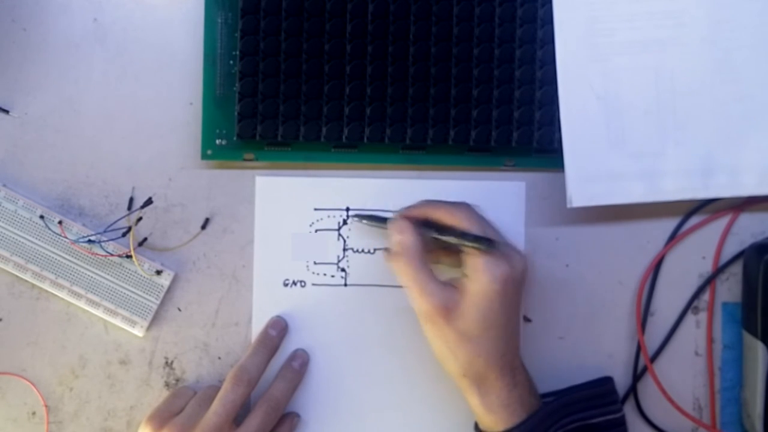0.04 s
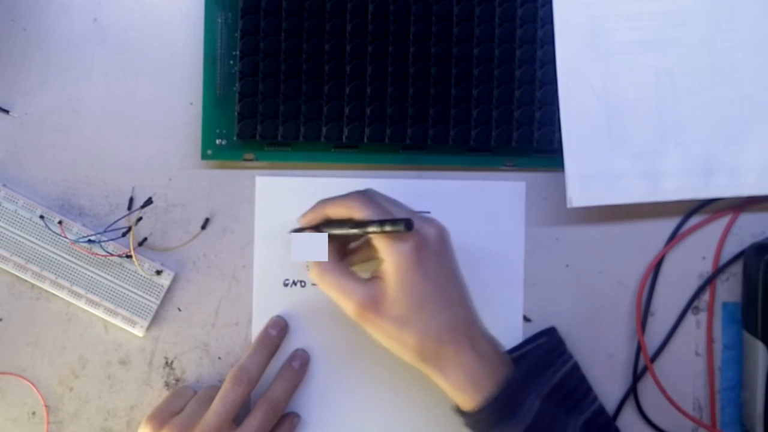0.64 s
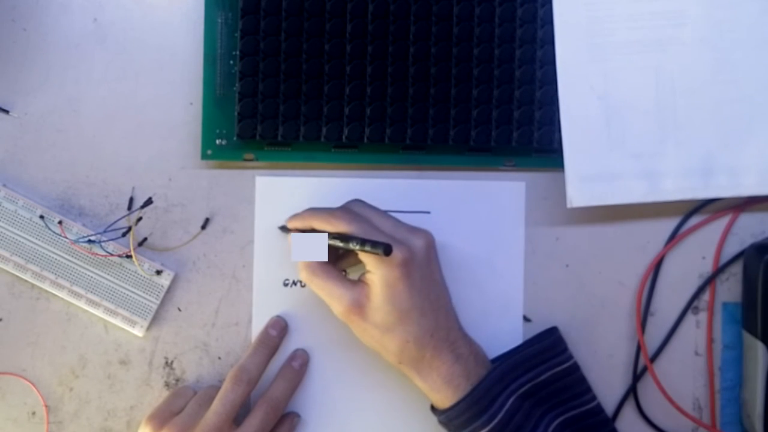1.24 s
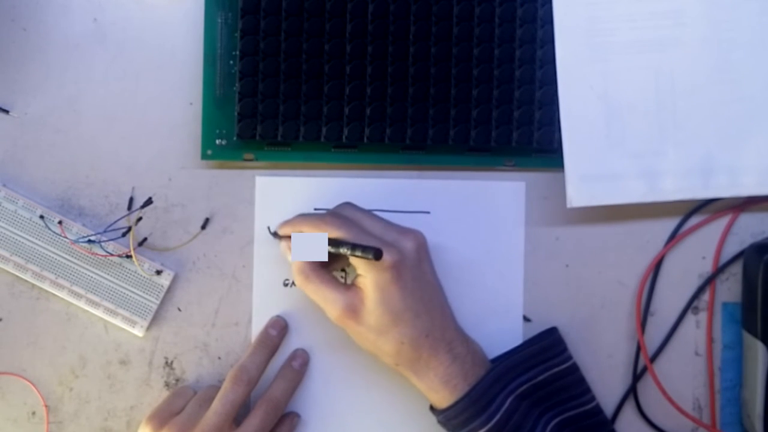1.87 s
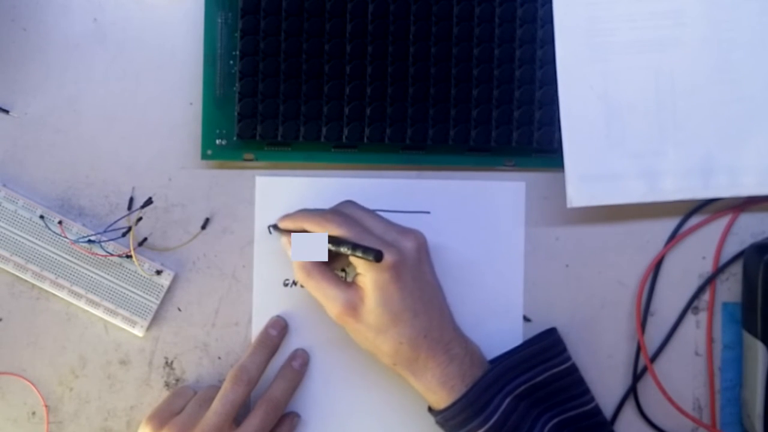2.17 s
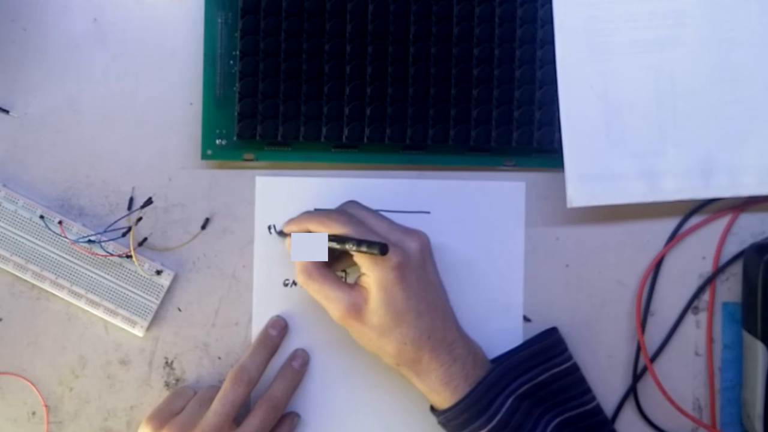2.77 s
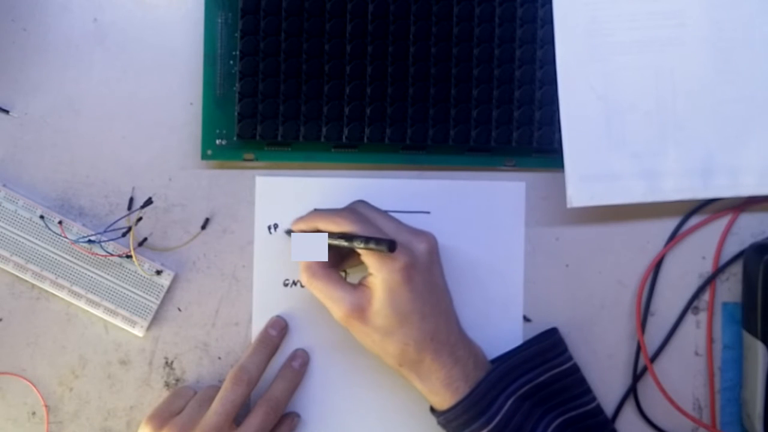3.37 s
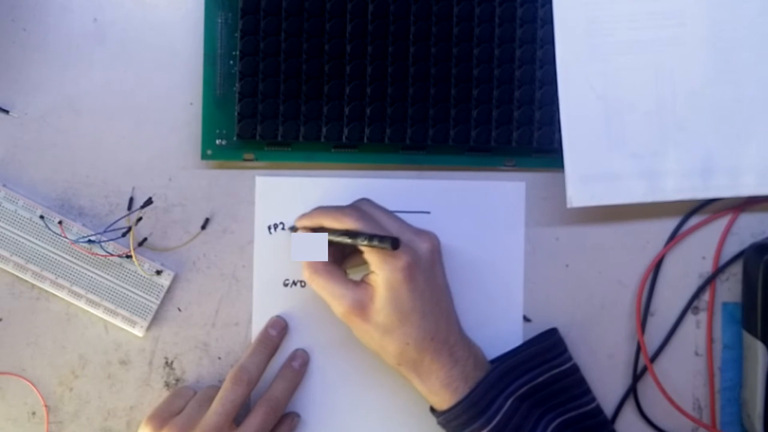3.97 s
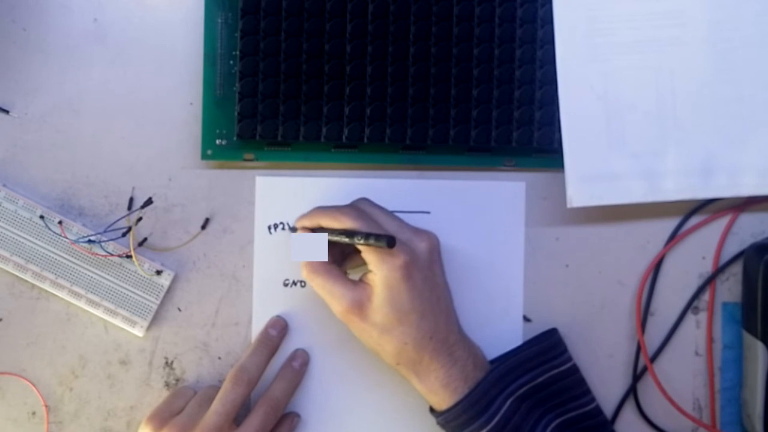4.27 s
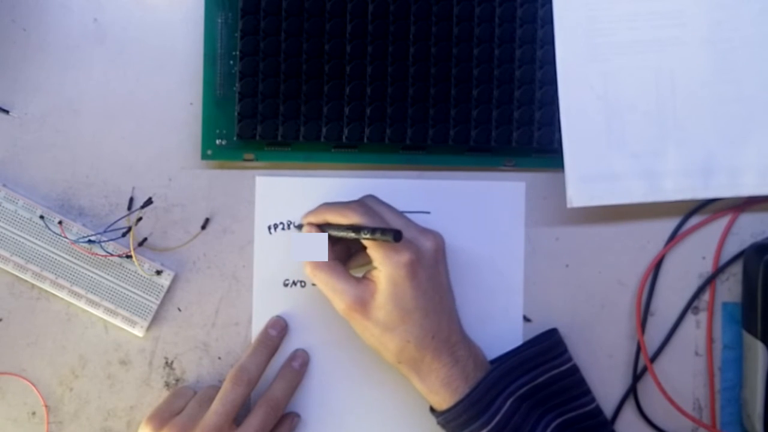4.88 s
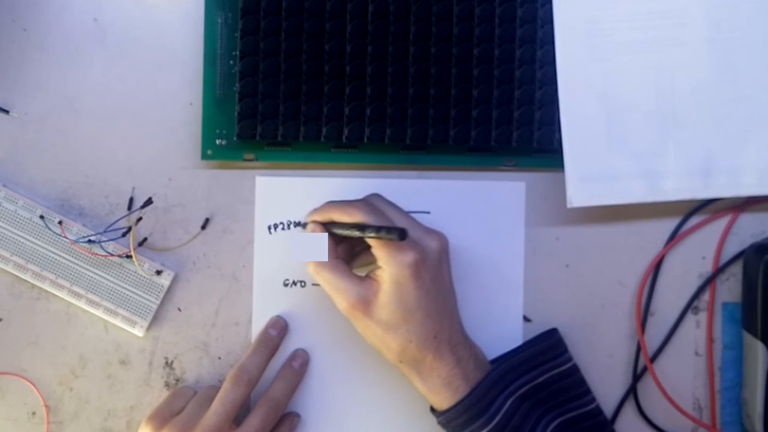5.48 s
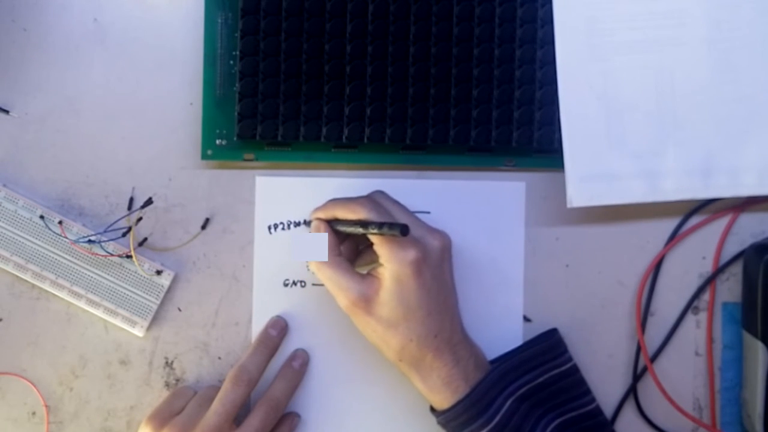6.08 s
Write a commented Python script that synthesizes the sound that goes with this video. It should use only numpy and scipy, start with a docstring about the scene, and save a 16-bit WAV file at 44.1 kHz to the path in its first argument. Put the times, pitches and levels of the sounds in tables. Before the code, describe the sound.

A steady hiss, low room rumble and faint electrical hum run throughout. Close to the microphone, a felt pen letters paper on a desk: the hand and tip slide softly over the sheet, with brief scratchy strokes and light ticks where the tip lands. The ticks are sparse at first and a little clearer in the second half. A few soft swells of deep rumble come near the end. The room sounds small and fairly dry.

```python
"""Room rumble, microphone hiss and a mains hum, in mono. Close by, a felt pen letters paper on a desk.
Hand and tip slide over the sheet. In quick strokes the tip rasps as fibres catch and let go;
where it lands or turns it judders and rings the desk. Nearby walls add a short tail.
Near the end come a few slow swells of deep rumble."""
import sys
import numpy as np
from scipy import signal
from scipy.fft import rfft, irfft, next_fast_len
from scipy.io import wavfile

SR = 44100
rng = np.random.default_rng(int(sys.argv[2]) if len(sys.argv) > 2 else 0)


def int16_out(signal):
    """Quantize to a 16-bit WAV file."""
    q = np.round(np.clip(np.atleast_2d(signal).T, -1, 1) * 32767)
    wavfile.write(sys.argv[1], SR, q.astype(np.int16))


N = 274302
N_FFT = next_fast_len(N, real=True)
TIME_S = np.arange(N) / SR
FREQ_HZ = np.maximum(np.fft.rfftfreq(N_FFT, 1 / SR), 1)

# room noise and microphone hiss: (frequency [Hz], relative density [dB])
ROOM_SPECTRUM = [(8, 1), (30, -0.5), (50, -4), (80, -8), (150, -13), (300, -17), (600, -22), (1000, -25),
                 (2000, -29), (4000, -31.5), (8000, -33.5), (15500, -34.5)]
# hand and tip slide, lifting in between: (start [s], end [s], relative level [dB])
SLIDES = [(0.377, .62, -54), (.97, 1.29, -51), (1.56, 2.2, -52.5), (2.62, 3.323, -53), (3.6, 3.9, -57),
          (4.28, 4.727, -50.5), (4.817, 6.13, -50)]
# rasp of paper fibres: (frequency [Hz], relative level [dB])
PAPER_SPECTRUM = [(200, 8.5), (600, -27), (1500, 2.5), (2900, -1), (3700, -1.5), (5400, -1.5), (7500, -0.5),
                  (10500, 0), (12000, -1), (13400, -1), (15500, -5)]
# modes of desk and pen: (frequency [Hz], width [Hz], relative level [dB])
DESK_MODES = [(523, 59, -2.5), (715, 156, 4), (815, 57, 0.5), (992, 87, -1.5), (1352, 160, -3),
              (1803, 99, -18), (1855, 205, -4), (2296, 120, -15.5), (2834, 51, -9), (3200, 150, -37)]
# heel of the hand shifts on the desk: (centre [s], half length [s], level [dB])
HAND_SHIFTS = [(.53, .06, -52), (1.09, 0.076, -51), (1.66, 0.13, -50.5), (5.42, 0.23, -50),
               (5.95, 0.14, -50)]
# brush of skin: (frequency [Hz], relative level [dB])
SKIN_SPECTRUM = [(60, -6), (160, -2), (450, 0), (800, -9.5), (1500, -13.5), (4000, -18), (15000, -50)]
# quick strokes of the tip: (centre [s], half length [s], level [dB])
STROKES = [(0.513, 0.019, -51), (1.963, 0.035, -49), (2.818, 0.026, -49), (3.277, 0.017, -46),
           (3.886, 0.038, -46), (4.343, .025, -52), (4.64, 0.022, -41.5), (4.968, 0.016, -48),
           (5.08, 0.02, -41), (5.384, 0.02, -48), (5.505, 0.021, -42.5), (6.015, 0.023, -41.5)]
# modes of barrel and nib: (frequency [Hz], width [Hz], relative level [dB])
BARREL_MODES = [(1900, 260, -2), (2520, 260, 0), (2850, 280, 3), (3220, 320, 3), (4480, 350, -1),
                (5500, 1100, -3)]
# tip landings; the judder sweeps up as the tip gathers speed, down as it brakes:
# (centre [s], half length [s], level [dB], pitch [ratio], hardness [dB/octave], sweep [s/octave])
LANDINGS = [(1.974, .018, -51, 1.08, 1, 0.0038), (2.802, 0.01, -50, 1.1, 1, 0),
            (3.278, 0.013, -38, 1.05, 2.5, 0.0035), (3.913, 0.012, -40.5, 1.05, 1, -0.015),
            (4.614, 0.0032, -35.5, .92, -8, 0.0013), (4.625, 0.0088, -38, 1, 3, .006),
            (5.1, 0.021, -43.5, 1.04, 2, -0.0068), (5.517, 0.011, -38.5, 1.08, -5.5, -.003)]
# swells of deep rumble: (centre [s], half length [s], level [dB], corner [Hz])
RUMBLE_SWELLS = [(5.268, 0.068, -17.5, 4.7), (5.633, 0.03, -23.5, 23), (5.725, 0.11, -19, 6.4),
                 (6.21, 0.033, -31.5, 41)]


def undb(db):
    """Decibels to gain."""
    return 10 ** (np.asarray(db) / 20)


def rms(x):
    """Root mean square."""
    return np.sqrt(np.mean(x ** 2))


def unit(x):
    """Scale to rms 1."""
    return x / rms(x)


def noise():
    """White noise."""
    return rng.standard_normal(N)


def shape(x, response):
    """Filter by a frequency response, to rms 1."""
    return unit(irfft(rfft(x, N_FFT) * response, N_FFT)[:N])


def colour(points):
    """Response through (frequency [Hz], level [dB]) points."""
    hz, db = np.transpose(points)
    return undb(np.interp(np.log(FREQ_HZ), np.log(hz), db))


def wander(corner_hz):
    """Slow random wander, rms 1."""
    return shape(noise(), 1 / (1 + (FREQ_HZ / corner_hz) ** 4))


def swell(centre_s, half_s):
    """Gaussian rise and fall."""
    return np.exp(-.5 * ((TIME_S - centre_s) / half_s) ** 2)


def room_noise(level_db=-38, drift_db=0.26):
    """Even room rumble and microphone hiss."""
    return shape(noise(), colour(ROOM_SPECTRUM)) * undb(level_db + drift_db * wander(2.7))


def mains_hum(hum_hz=119.9, level_db=-48.5, waver_db=1.5, waver_rad=0.11):
    """Slightly wavering tone at twice the mains rate."""
    tone = unit(np.sin(2 * np.pi * hum_hz * TIME_S + waver_rad * wander(8)))
    return tone * undb(level_db + waver_db * wander(6.4))


def slide_force(start_s, end_s, attack_s=0.022, release_s=0.04):
    """Force eases in, holds, eases off."""
    rise = 1 + np.tanh((TIME_S - start_s) / (2 * attack_s))
    fall = 1 + np.tanh((end_s - TIME_S) / (2 * release_s))
    return rise * fall / 4


def slips(rate_hz, scatter_db):
    """Tiny random clicks of uneven size: fibres catch and let go."""
    clicks = (rng.random(N) < rate_hz / SR) * np.sign(noise())
    return unit(clicks * undb(scatter_db * noise()))


def ringing(modes, pitch=1):
    """Response of damped modes with steep skirts; the place of contact shifts their pitch."""
    return sum(undb(db) / (1 + 2j * (FREQ_HZ - hz * pitch) / width_hz) ** 2
               for hz, width_hz, db in modes)


def paper_rub(desk_db=-8, gain_db=-1, uneven_db=2.14):
    """Skin and tip slide lightly over the sheet and stir the desk."""
    fibres = slips(rate_hz=9000, scatter_db=2)
    force = sum(undb(db) * slide_force(start_s, end_s) for start_s, end_s, db in SLIDES)
    force *= undb(gain_db + uneven_db * wander(30))
    paper = shape(fibres, colour(PAPER_SPECTRUM))
    desk = undb(desk_db) * shape(noise(), ringing(DESK_MODES))
    return force * (paper + desk)


def hand_brush():
    """The hand moves to the next letters with a dull brush."""
    force = sum(undb(db) * swell(centre_s, half_s) for centre_s, half_s, db in HAND_SHIFTS)
    return force * shape(noise(), colour(SKIN_SPECTRUM))


def tip_rasp(desk_db=-13, barrel_db=-7, uneven_db=0.2):
    """The tip drags over fibres: a bright dense crackle that stirs barrel and desk."""
    power = sum((undb(db) * swell(centre_s, half_s)) ** 2 for centre_s, half_s, db in STROKES)
    fibres = slips(rate_hz=7000, scatter_db=5)
    force = np.sqrt(power) * undb(-uneven_db * wander(90))
    paper = shape(fibres, colour(PAPER_SPECTRUM))
    desk = undb(desk_db) * shape(fibres, ringing(DESK_MODES))
    barrel = undb(barrel_db) * shape(fibres, ringing(BARREL_MODES))
    return force * unit(paper + desk + barrel)


def tip_judder(pivot_hz=1000):
    """Each landing is a flurry of slips sweeping the desk's modes; harder contact favours high ones."""
    out = np.zeros(N)
    octaves = np.log2(np.clip(FREQ_HZ, 400, 4000) / pivot_hz)
    for centre_s, half_s, db, pitch, hardness_db_per_oct, sweep_s_per_oct in LANDINGS:
        force = swell(centre_s, half_s)
        delay_s = sweep_s_per_oct * octaves  # each mode is reached in turn
        sweep = np.exp(-2j * np.pi * np.cumsum(delay_s) * SR / N_FFT)
        response = ringing(DESK_MODES, pitch) * undb(hardness_db_per_oct * octaves) * sweep
        ring = shape(force * slips(rate_hz=1500, scatter_db=1.5), response)
        out += undb(db) * rms(force) * ring
    return out


def deep_rumble():
    """Slow pressure swings, mostly below hearing, with a soft low edge."""
    out = np.zeros(N)
    for centre_s, half_s, db, corner_hz in RUMBLE_SWELLS:
        envelope = swell(centre_s, half_s)
        ratio = FREQ_HZ / corner_hz
        band = ratio / (1 + ratio ** 2) ** 2
        out += undb(db) * rms(envelope) * shape(envelope * noise(), band)
    return out


def add_reflections(x, t60_s=0.14, wet_db=-11, gap_s=0.004):
    """Nearby walls add a short diffuse tail."""
    t = TIME_S[:SR // 2]
    tail = rng.standard_normal(len(t)) * undb(-60 * t / t60_s) * (t > gap_s)
    return x + undb(wet_db) * signal.fftconvolve(x, tail / np.linalg.norm(tail))[:N]


def scene():
    """One microphone feeds both channels."""
    writing = tip_rasp() + paper_rub() + hand_brush() + tip_judder()
    mono = add_reflections(writing) + room_noise() + mains_hum() + deep_rumble()
    return np.array([mono, mono])


def record(dry):
    """The recorder cuts the top steeply."""
    cutoff_hz = 15750
    return signal.sosfilt(signal.ellip(12, .1, 70, cutoff_hz, fs=SR, output="sos"), dry)


dry = scene()
out = record(dry)
int16_out(out)
```